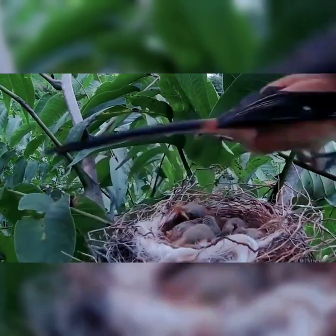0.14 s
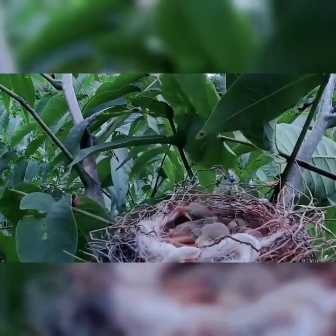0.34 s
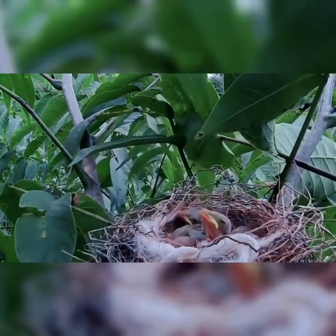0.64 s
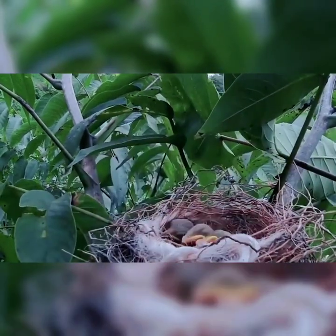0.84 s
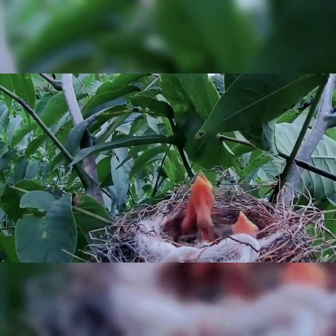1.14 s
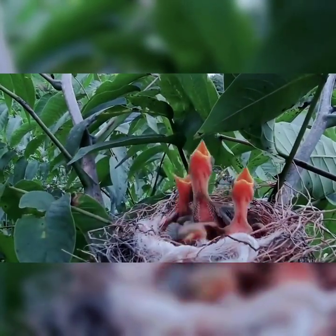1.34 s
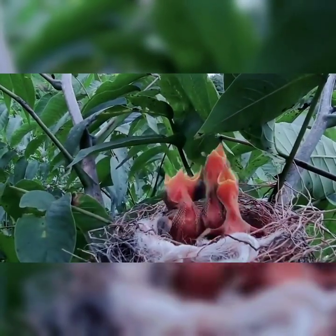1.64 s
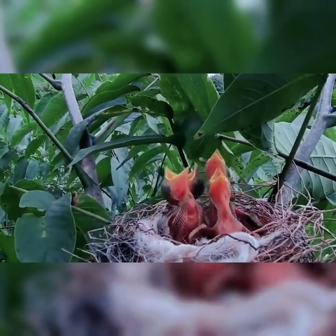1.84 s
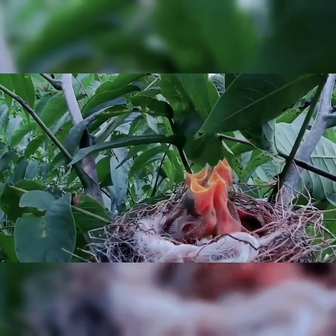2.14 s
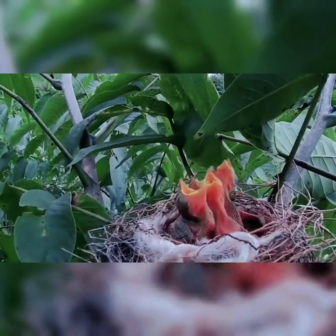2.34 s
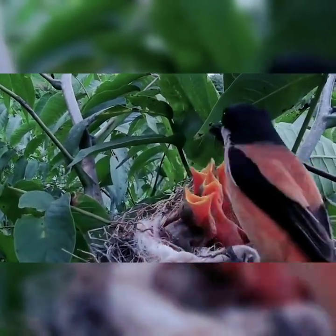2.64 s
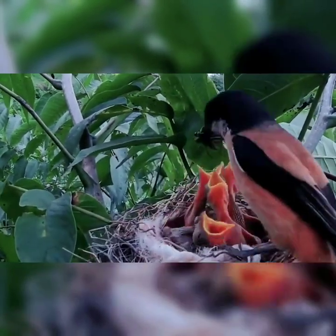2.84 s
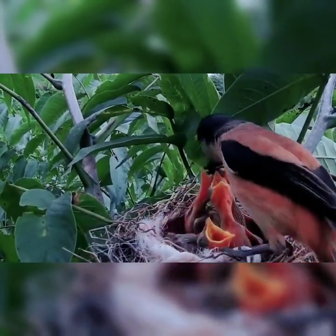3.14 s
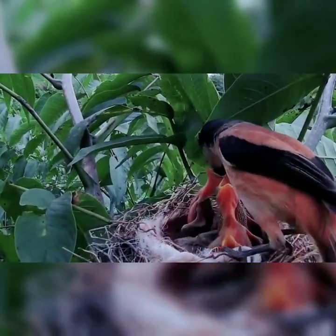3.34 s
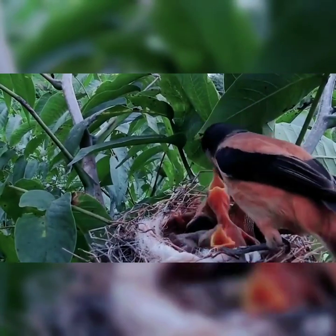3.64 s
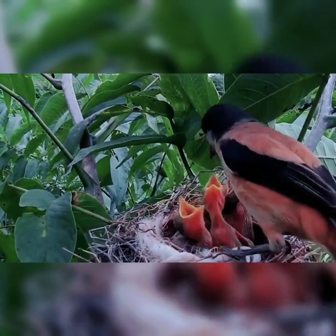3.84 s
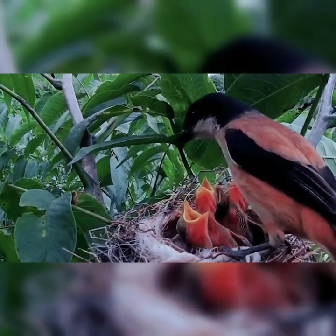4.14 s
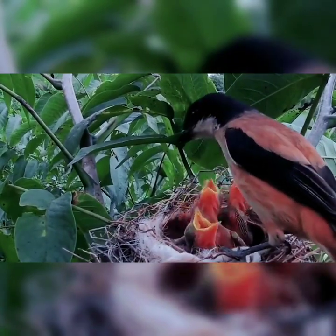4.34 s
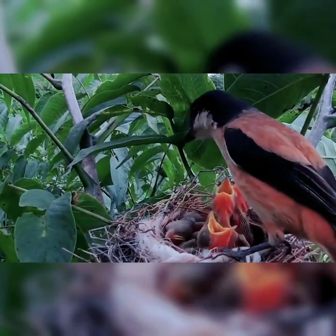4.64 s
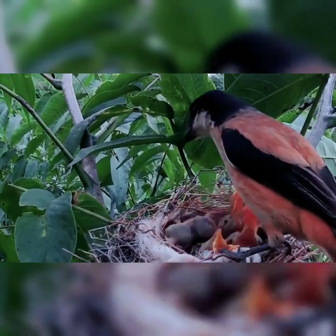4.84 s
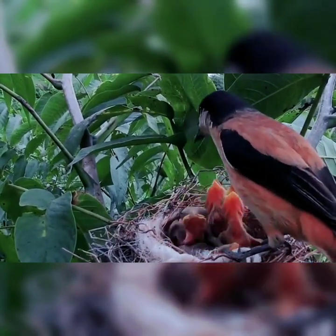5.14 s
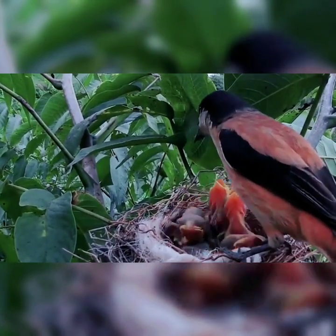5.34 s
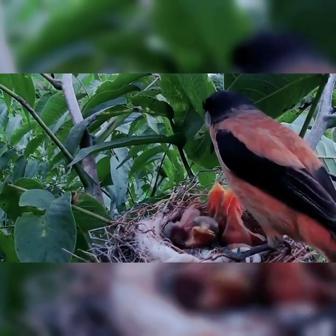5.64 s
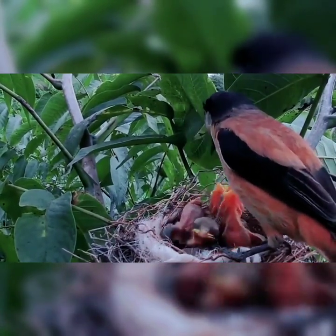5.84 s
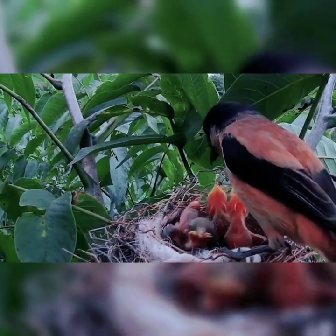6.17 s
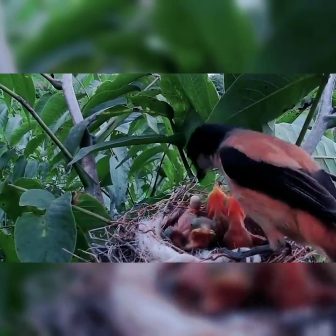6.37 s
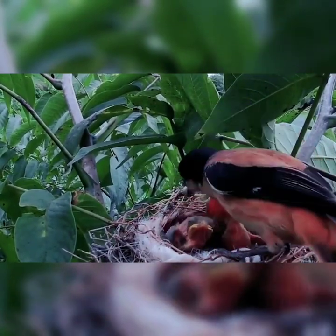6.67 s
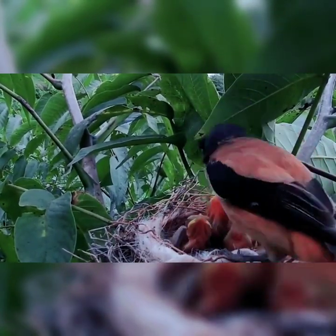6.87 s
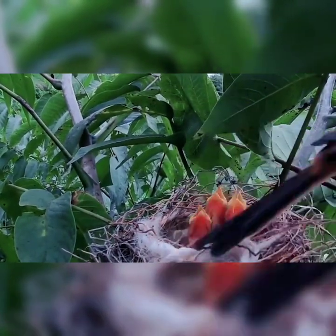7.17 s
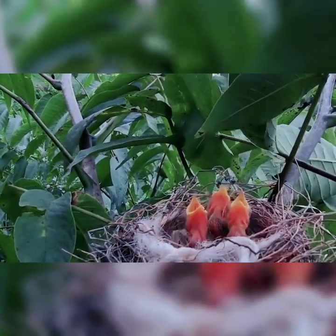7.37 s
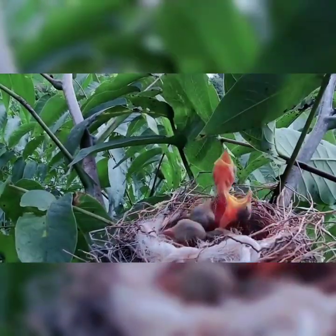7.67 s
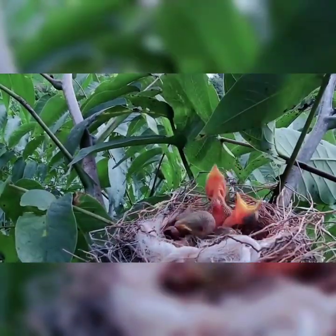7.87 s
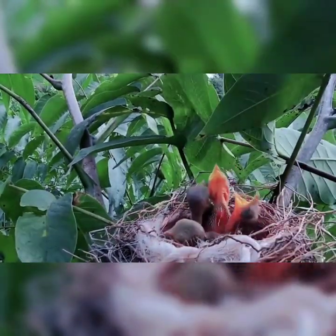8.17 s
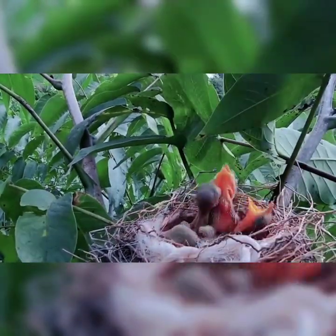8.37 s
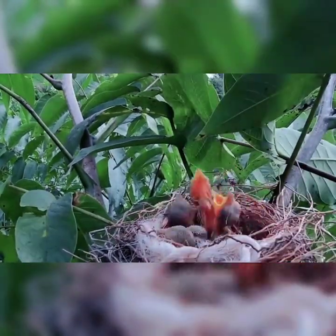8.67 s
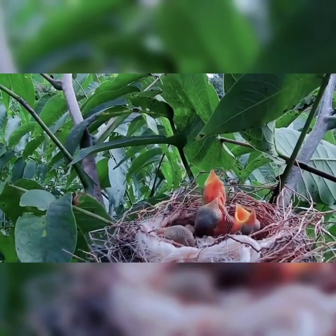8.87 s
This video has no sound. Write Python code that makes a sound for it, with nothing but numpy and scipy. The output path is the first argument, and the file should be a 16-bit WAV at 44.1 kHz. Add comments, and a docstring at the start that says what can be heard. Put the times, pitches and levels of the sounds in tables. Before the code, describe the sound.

A parent bird takes off from a nest with fluttering wing puffs and dull low thumps, after two chick cheeps and short pipes. A quiet leafy pause holds a soft knock, then the chicks break into fast, overlapping, raspy high cheeps. The parent lands with a heavy thud; begging grows loud and squealing, then thins. It flaps off again and scattered cheeps continue. Very close microphone fixed near the nest, picking up low knocks, with faint insects and forest hush behind.

```python
"""Leafy bush in a forest: nestlings beg in overlapping arched whistles with sidebands and rasp,
short piping notes, loud low squeals and thin whines, all from fluttering near-sines.
A parent flies off and lands close by: soft clucks, wing beats as puffs of noise, and decaying
sines for the knocked, swaying mount, with a lumpy rumble from the branch.
Insect blips and drones, a distant falling whistle and shaped forest noise lie behind."""
import sys
import numpy as np
from scipy import signal
from scipy.fft import rfft, irfft, next_fast_len
from scipy.io import wavfile
from scipy.ndimage import uniform_filter1d, map_coordinates

SR = 44100
rng = np.random.default_rng(int(sys.argv[2]) if len(sys.argv) > 2 else 0)


def transcribe(signal):
    """Save signal, clipped to [-1, 1], as a 16-bit WAV file at the path in sys.argv[1]."""
    frames = np.atleast_2d(signal).T
    limited = np.clip(frames, -1, 1)
    pcm = np.round(limited * 32767).astype(np.int16)
    wavfile.write(sys.argv[1], SR, pcm)


N = 397341
TIME_S = np.arange(N) / SR

# loudest begging calls: [top of arch t/s, top f/Hz, length/s, whistle level/dB]
BEG_CALLS = [(0.03, 5660, 0.1, -28.5), (0.111, 6950, 0.09, -31), (1.517, 6100, 0.078, -29),
             (1.647, 5600, 0.058, -26.5), (1.696, 7500, 0.069, -32.5), (1.8, 6970, 0.061, -26.5),
             (1.842, 7750, 0.047, -29), (1.947, 7070, 0.064, -28.5), (2.045, 5570, 0.065, -28),
             (2.097, 6850, 0.067, -28), (2.183, 5450, 0.061, -30), (2.312, 7220, 0.071, -27.5),
             (2.431, 6300, 0.043, -26.5), (2.463, 7040, 0.096, -27.5), (2.549, 6070, 0.049, -22),
             (2.6, 6940, 0.029, -21.5), (2.683, 6070, 0.089, -26.5), (2.825, 6090, 0.044, -21.5),
             (2.886, 6660, 0.057, -32.5), (2.978, 5750, 0.11, -29), (3.042, 6850, 0.043, -29),
             (3.132, 6100, 0.049, -26), (3.192, 6960, 0.046, -27), (3.311, 6240, 0.06, -23.5),
             (3.351, 6880, 0.073, -23), (3.425, 5850, 0.037, -23.5), (3.512, 7300, 0.095, -29),
             (3.646, 7310, 0.038, -22), (3.801, 7030, 0.053, -22.5), (3.916, 7340, 0.048, -32),
             (3.955, 7100, 0.063, -24), (4.105, 7120, 0.06, -25.5), (4.265, 6020, 0.042, -23),
             (4.322, 7120, 0.052, -30.5), (4.433, 7360, 0.058, -30), (4.457, 6310, 0.047, -21.5),
             (4.529, 7210, 0.045, -27), (4.628, 5800, 0.063, -28.5), (4.689, 7640, 0.085, -25.5),
             (4.786, 7150, 0.064, -24), (4.835, 6400, 0.053, -23), (4.958, 5980, 0.094, -26.5),
             (5.09, 6550, 0.036, -27), (5.153, 6200, 0.068, -28), (5.253, 6400, 0.031, -25.5),
             (5.435, 6740, 0.06, -28.5), (5.566, 6100, 0.091, -30.5), (5.632, 6480, 0.035, -20),
             (5.832, 6410, 0.052, -22.5), (6.029, 6300, 0.03, -21.5), (6.201, 6470, 0.057, -21.5),
             (6.314, 7000, 0.069, -28), (6.429, 6350, 0.028, -23), (6.629, 6130, 0.033, -28.5),
             (6.841, 6440, 0.053, -28.5), (7.055, 6500, 0.06, -30), (7.489, 6200, 0.029, -28.5),
             (7.571, 6200, 0.029, -31), (7.706, 6570, 0.071, -26), (7.858, 6890, 0.091, -24),
             (7.954, 7070, 0.023, -26.5), (8.013, 6940, 0.06, -29), (8.081, 5020, 0.07, -30),
             (8.141, 6650, 0.057, -23.5), (8.282, 6490, 0.085, -29.5), (8.394, 6600, 0.06, -29.5),
             (8.444, 5410, 0.089, -25), (8.571, 6730, 0.093, -26.5), (8.845, 7030, 0.086, -29.5),
             (8.964, 7070, 0.05, -25.5)]
# weaker calls, loudest level over time: [t/s, level/dB]
WEAK_CALL_LEVEL = [(1.5, -28), (3.3, -28), (4.8, -29.5), (5.3, -34), (9, -34)]
# brood's voice over time: [t/s, relative rasp level/dB, relative sideband level/dB, mean sink after top f/Hz]
BROOD_VOICE = [(0, -14, -11, 900), (1.6, -3.5, -12, 1100), (2.6, -9, -15, 900), (4.7, -2, -11, 900),
               (5.6, -13, -16, 1100), (7.5, -14, -17, 800), (7.9, -11, -9, 1700)]
# piping notes: [middle t/s, lowest f/Hz, level/dB, half length/s]
PIPING_NOTES = [(0.084, 3760, -20.5, 0.018), (0.315, 3500, -19.5, 0.0061), (1.563, 3295, -20, 0.0094),
                (1.963, 3270, -21.5, 0.0094), (2.083, 3226, -22, 0.011), (2.871, 3370, -23.5, 0.0063),
                (3.207, 3250, -20.5, 0.014), (4.092, 3130, -22, 0.003), (4.49, 3260, -19.5, 0.00257),
                (5.363, 3210, -23.5, 0.018), (5.684, 3300, -19.5, 0.0081), (6.019, 3010, -9.5, 0.0089),
                (6.743, 3200, -19.5, 0.021)]
# low squeals, one contour each, rows: [t/s, f/Hz, level/dB]
SQUEAL_CONTOURS = [
    [(5.095, 3150, -31), (5.11, 2860, -17.5), (5.128, 3500, -29), (5.148, 2950, -19.5),
     (5.179, 3990, -23.5)],
    [(5.287, 2970, -25), (5.31, 4430, -21.5), (5.333, 4540, -17.5), (5.345, 4400, -21), (5.357, 4700, -16),
     (5.384, 3160, -31)],
    [(5.487, 2890, -28), (5.505, 3930, -22.5), (5.52, 3870, -18), (5.545, 4460, -43)],
    [(5.7, 3240, -21), (5.706, 2990, -13), (5.737, 4050, -31.5)],
    [(5.941, 3250, -21), (5.955, 3180, -16), (5.968, 4160, -30), (5.995, 5100, -38), (6.012, 4040, -35)],
]
# thin whines: [start t/s, length/s, start f/Hz before scoop, end f/Hz, level/dB]
WHINE_NOTES = [(0.175, 0.064, 3780, 4170, -30.5), (0.538, 0.07, 4270, 3930, -34),
               (1.286, 0.15, 3990, 3220, -31.5), (4.134, 0.073, 5720, 5640, -31.5),
               (4.333, 0.076, 5700, 5300, -41), (4.653, 0.059, 5950, 5820, -26),
               (6.531, 0.069, 3450, 3510, -34.5), (7.07, 0.086, 3540, 3600, -32.5),
               (7.565, 0.073, 3510, 3630, -37.5)]
# parent's clucks: [middle t/s, middle f/Hz, middle level/dB]
CLUCK_NOTES = [(4.101, 1438, -29), (4.113, 1360, -31.5), (4.916, 1340, -36.5)]
# wing beats: [t/s, relative knock level/dB, low-mode pitch factor, relative puff level/dB]
WING_BEATS = [(0.224, -20, 0.9, -23.5), (0.254, -4.5, 1.02, -22.5), (.277, -7.5, 0.77, -35),
              (0.338, -8, 0.64, -18.5), (1.025, -0.5, 1.05, -19), (2.08, -18, 1.1, -13),
              (2.157, -2, 0.9, -11), (2.226, -6, 1.06, -12.5), (2.259, -13.5, 1.2, -16),
              (2.539, -14.5, 0.98, -12), (2.665, -8, .92, -15.5), (7.236, -3, 0.96, -19),
              (7.265, -9, 0.72, -28), (7.339, -7.5, 0.82, -30), (8.956, -21, 1.17, -18)]
# feathers brushing leaves: [t/s, relative level/dB, Gaussian sigma/s]
LEAF_BRUSHES = [(0.321, -23, 0.015), (0.353, -13, 0.0035), (0.456, -20, 0.0041), (2.635, -20, 0.0029),
                (7.305, -17.5, 0.0096)]
# mount ring modes: [f/Hz before pitch factor, relative level/dB, t60/s]
MOUNT_MODES = [(157.7, -5, 0.25), (228.7, -2, 0.15), (318, -4.5, 0.057), (642, -13, 0.053),
               (1105, -22, 0.075)]
# mount sways at take-off and landing: [t/s, strength/dB, t60/s]
MOUNT_SWAYS = [(0.338, -0.5, 0.4), (1.058, 3.5, 0.62), (2.101, -8.5, 0.41), (2.2, -3, 0.18),
               (2.6, 12, 0.05), (7.338, 2.5, 0.41)]
# distant whistles: [start t/s, level/dB]
FAR_WHISTLES = [(.84, -40.5), (7.578, -49)]
# forest floor: [t/s, relative level/dB]
FOREST_LEVEL = [(0, -36), (2.9, -35), (4, -38.5), (6.5, -40), (9, -39.5)]
# wavering forest bands, rumble to insects: [f/Hz, nominal width/Hz, relative level/dB, waver/dB]
DRONE_BANDS = [(154.2, 28, -43, 5), (760, 128, -56, 5), (3445, 550, -44.5, 3.5), (3434, 75, -44.5, 6)]
# noise colours of dull air, bright air and forest: [f/Hz, relative spectral level/dB]
DULL_AIR_SPECTRUM = [(100, 18), (300, -2), (650, 5), (1150, 9.5), (2000, -4.5), (3200, -52), (7000, -43),
                     (14000, -75)]
BRIGHT_AIR_SPECTRUM = [(200, 12.5), (1000, 0.5), (2200, -3), (3300, 4), (7300, -6.5), (9000, -22),
                       (15000, -45)]
FOREST_SPECTRUM = [(25, 7), (70, -1), (220, 1.5), (500, -15), (800, -11), (2200, -16), (4000, -18),
                   (7200, -14.5), (8600, -24.5), (13200, -40), (15500, -77)]

# call arch: climb from the throat's resonance, then part of the way back down
RISE_SHARE, RISE_POWER, FOOT_HZ, SINK_POWER = 0.36, 2.7, 3184, 1.8
# weaker calls: uniform ranges
WEAK_TOP_MIN_HZ, WEAK_TOP_RANGE_HZ = 5000, 2600
WEAK_MIN_S, WEAK_MAX_S = 0.045, 0.12
WEAK_RISE_MIN, WEAK_RISE_RANGE = 0.27, 0.45
WHINE_STEP_DB, WHINE_SCOOP_HZ = -6, 700
# puff: exponential time constants, then a wide Gaussian wash
PUFF_ATTACK_S, PUFF_DECAY_S, PUFF_BRIGHT_DB = 0.0043, 0.0067, -5
WASH_DB, WASH_SIGMA_S = -21, 0.034
RUSTLE_DB, RUSTLE_DECAY_S = -16, 0.15
SWAY_HZ = 36.3
STOPBAND_HZ = 16000


def from_db(db):
    """Amplitude from dB."""
    return 10 ** (np.asarray(db) / 20)


def rms_one(x):
    """Scale to rms 1."""
    return x / np.sqrt(np.mean(x ** 2) + 1e-20)


def curve(rows, s):
    """Straight lines through the rows, read at s."""
    return np.interp(s, *np.transpose(rows))


def add(out, s, sound):
    """Mix a sound in from time s on."""
    start = int(round(s * SR))
    lo, hi = max(start, 0), min(start + len(sound), N)
    if hi > lo:
        out[lo:hi] += sound[lo - start:hi - start]


def drift(rate_hz, size):
    """Smooth random wander of spread about 1, through rate_hz knots per second."""
    knots = rng.standard_normal(int(size * rate_hz / SR) + 4)
    position = 1 + np.arange(size) * rate_hz / SR
    return map_coordinates(knots, [position], order=3, mode="nearest")


def shaped_noise(spectrum):
    """Noise of a given colour, rms 1."""
    hz, db = np.transpose(spectrum)
    size = next_fast_len(N)
    bins_hz = np.maximum(np.fft.rfftfreq(size, 1 / SR), 1)
    gain = from_db(np.interp(np.log(bins_hz), np.log(hz), db))
    return rms_one(irfft(rfft(rng.standard_normal(size)) * gain)[:N])


def resonate(x, hz, width_hz):
    """Two-pole resonance, gain about 1 on top."""
    r = np.exp(-np.pi * width_hz / SR)
    numerator = np.array([1, 0, -1]) * (1 - r * r) / 2
    denominator = [1, -2 * r * np.cos(2 * np.pi * hz / SR), r * r]
    return signal.lfilter(numerator, denominator, x)


def whistle(pitch_hz, jitter, shimmer_db, flutter_hz=650):
    """Near sine of rms about 1 whose pitch (jitter as a fraction) and level flutter."""
    size = len(pitch_hz)
    phase = 2 * np.pi * np.cumsum(pitch_hz * (1 + jitter * drift(flutter_hz, size))) / SR
    return np.sqrt(2) * np.sin(phase) * from_db(shimmer_db * drift(flutter_hz / 2, size))


def fade(u, edge):
    """Closes a note smoothly as u nears -1 or 1."""
    return np.sin(np.pi / 2 * np.clip((1 - np.abs(u)) / edge, 0, 1)) ** 2


def cheep(s, top_hz, length_s, rise_share, flank_db=11, throat_db=6, rasp_db=-7):
    """Arched whistle over a ladder of sidebands from the slower beat of the syrinx, plus rasp."""
    times, *columns = np.transpose(BROOD_VOICE)
    hoarse_db, sideband_db, sink_hz = [np.interp(s, times, column) for column in columns]
    rise_s, fall_s = rise_share * length_s, (1 - rise_share) * length_s
    t = np.arange(-rise_s, fall_s, 1 / SR)
    size = len(t)
    u = np.where(t < 0, t / rise_s, t / fall_s)
    climb = (top_hz - FOOT_HZ) * np.abs(u) ** RISE_POWER
    sink = sink_hz * (0.5 + rng.random()) * np.abs(u) ** SINK_POWER
    pitch = (top_hz - np.where(t < 0, climb, sink)) * (1 + 0.017 * drift(110, size))

    arch_db = -flank_db * u ** 2
    roughness = from_db(hoarse_db)
    call = from_db(arch_db + 2.4 * drift(150, size)) * whistle(pitch, 0.004 + 0.012 * roughness, 2.5)

    spacing = rng.uniform(0.11, 0.18)  # fraction of the pitch
    for step in (-3, -2, -1, 1):
        partial = pitch * (1 + step * spacing)
        # the throat lifts its own resonance and shuts out what lies below
        lift_db = throat_db / (1 + ((partial - 3500) / 400) ** 2)
        cut_db = np.maximum(3200 - partial, 0) / 30
        level_db = sideband_db - 2 - 2 * abs(step + 1) + lift_db - cut_db + arch_db / 2
        waver_db = 4 * drift(90, size)
        call += from_db(level_db + waver_db) * whistle(partial, 0.006 + 0.02 * roughness, 2.5)

    rasp = drift(3600, size) * whistle(np.full(size, 0.8 * top_hz), 0.06, 2)
    call += from_db(rasp_db + hoarse_db + arch_db + 5 * drift(100, size)) * rasp
    return call * fade(u, 0.1)


def begging(scatter_db=8.5, count=95):
    """Listed loud calls, with weaker calls at jittered intervals, band-limited together."""
    out = np.zeros(N)
    for s, top_hz, length_s, db in BEG_CALLS:
        add(out, s - RISE_SHARE * length_s, from_db(db) * cheep(s, top_hz, length_s, RISE_SHARE))
    first_s = WEAK_CALL_LEVEL[0][0]
    for slot, (late, high, long, soft, lean) in enumerate(rng.random((count, 5))):
        s = first_s + (slot + late) / count * (N / SR - first_s)
        length_s = WEAK_MIN_S + (WEAK_MAX_S - WEAK_MIN_S) * long
        rise_share = WEAK_RISE_MIN + WEAK_RISE_RANGE * lean
        weak = cheep(s, WEAK_TOP_MIN_HZ + WEAK_TOP_RANGE_HZ * high, length_s, rise_share)
        level_db = curve(WEAK_CALL_LEVEL, s) - scatter_db * soft
        add(out, s - rise_share * length_s, from_db(level_db) * weak)
    band = signal.butter(6, [2800, 8000], "band", fs=SR, output="sos")
    return signal.sosfilt(band, out)


def piping(bend=0.248, flank_db=11):
    """Short notes dip in pitch to the throat's resonance; the loud ones are the purest."""
    out = np.zeros(N)
    for s, hz, db, half_s in PIPING_NOTES:
        u = np.arange(-half_s, half_s, 1 / SR) / half_s
        rough = np.clip((-db - 8) / 14, 0.15, 1.0)
        pitch = hz * (1 + bend * u ** 2 * half_s / 0.02)  # longer notes bend further
        note = whistle(pitch, 0.03 * rough, 2.8 * rough)
        add(out, s - half_s, from_db(db - flank_db * u ** 2) * fade(u, 0.48) * note)
    return out


def squealing(second_ratio=1.27, second_db=-15):
    """Low squeals swoop up and down; the syrinx's other side adds a rough, higher voice."""
    out = np.zeros(N)
    for points in SQUEAL_CONTOURS:
        s, hz, db = np.transpose(points)
        t = np.arange(s.min(), s.max(), 1 / SR)
        pitch = uniform_filter1d(np.interp(t, s, hz), size=350, mode="nearest")
        second = whistle(second_ratio * pitch, 0.04, 5)
        voice = whistle(pitch, 0.012, 1.8) + from_db(second_db) * second
        envelope = from_db(np.interp(t, s, db)) * fade(np.linspace(-1, 1, len(t)), 0.1)
        add(out, s[0], envelope * voice)
    return out


def whining():
    """Thin notes scoop up, hold, then bend to their end pitch; two sidebands arch above each."""
    out = np.zeros(N)
    for s, length_s, start_hz, end_hz, db in WHINE_NOTES:
        u = np.linspace(0, 1, int(length_s * SR))
        pitch = start_hz + (end_hz - start_hz) * u ** 2 - WHINE_SCOOP_HZ * (1 - u) ** 8
        spacing_hz = 450 + 540 * np.sin(np.pi * u) + 72 * drift(50, len(u))
        for step in range(3):
            level_db = db + step * WHINE_STEP_DB + 2.5 * drift(70, len(u))
            line = whistle(pitch + step * spacing_hz, 0.01, 2)
            add(out, s, from_db(level_db) * fade(2 * u - 1, 0.34) * line)
    return out


def clucks(half_s=0.0073, overtone_db=-7):
    """Parent's brief falling notes, loudest near the start, with an octave above."""
    out = np.zeros(N)
    u = np.arange(-half_s, half_s, 1 / SR) / half_s
    for s, hz, db in CLUCK_NOTES:
        pitch = hz * (1 - 0.034 * u)
        voice = whistle(pitch, 0.015, 1.5) + from_db(overtone_db) * whistle(2 * pitch, 0.02, 2.5)
        add(out, s - half_s, from_db(db - 9.7 * u) * fade(u, 0.35) * voice)
    return out


def wings(grain_db=3.5, puff_trim_db=-1.0, leaves_dull_db=-12.0):
    """Air noise: mainly dull from wing strokes, mainly bright where feathers brush leaves."""
    puffs, leaves = np.zeros(N), np.zeros(N)
    t = np.arange(-SR // 2, SR // 2) / SR
    puff = np.exp(-np.abs(t) / np.where(t < 0, PUFF_ATTACK_S, PUFF_DECAY_S))
    puff += from_db(WASH_DB) * np.exp(-(t / WASH_SIGMA_S) ** 2 / 2)
    for s, _, _, db in WING_BEATS:
        add(puffs, s + t[0], from_db(db + puff_trim_db) * puff)
    rustle = from_db(RUSTLE_DB) * (t > 0) * np.exp(-np.abs(t) / RUSTLE_DECAY_S)
    for s, db, sigma_s in LEAF_BRUSHES:
        add(leaves, s + t[0], from_db(db) * (np.exp(-(t / sigma_s) ** 2 / 2) + rustle))
    dull = puffs + from_db(leaves_dull_db) * leaves
    bright = leaves + from_db(PUFF_BRIGHT_DB) * puffs
    air = dull * shaped_noise(DULL_AIR_SPECTRUM) + bright * shaped_noise(BRIGHT_AIR_SPECTRUM)
    return air * from_db(grain_db * drift(500, N))


def mount(rattle_db=1.5, push_s=0.003):
    """Wing beats ring the mount's modes; heavy pushes set the whole of it swaying."""
    out = np.zeros(N)
    t = np.arange(SR) / SR
    for s, db, factor, _ in WING_BEATS:
        for hz, mode_db, t60_s in MOUNT_MODES:
            pitch = hz * factor if hz < 500 else hz  # the bird's weight shifts only the low modes
            level_db = db + mode_db + rattle_db * rng.standard_normal() - 60 * t / t60_s
            add(out, s, from_db(level_db) * np.sin(2 * np.pi * pitch * t))
    for s, db, t60_s in MOUNT_SWAYS:
        envelope = from_db(db - 60 * t / t60_s) * (1 - np.exp(-t / push_s))
        add(out, s, envelope * np.sin(2 * np.pi * SWAY_HZ * t))
    return out


def shaken_branch(motion, settle_s=0.052, level_db=-19):
    """Branch trembles on against the mount: lumpy rumble following the smoothed motion energy."""
    r = np.exp(-1 / (settle_s * SR))
    envelope = np.sqrt(signal.lfilter([1 - r], [1, -r], motion ** 2 + 1e-18))
    rumble = shaped_noise([(30, 4.0), (200, 11.0), (330, -6.5), (600, -14.5), (2000, -68.0)])
    return from_db(level_db + 5.6 * drift(70, N)) * envelope * rumble


def insect(per_s=40, lowest_hz=6700, spread_hz=1300, loudest_db=-41, half_s=0.0077):
    """Insect ticks unevenly, each tick a tiny high blip."""
    out = np.zeros(N)
    u = np.arange(-half_s, half_s, 1 / SR) / half_s
    for slot, (late, soft, high) in enumerate(rng.random((int(per_s * N / SR), 3))):
        pitch = np.full(len(u), lowest_hz + spread_hz * high ** 2)
        blip = fade(u, 1) * whistle(pitch, 0.02, 2)
        add(out, (slot + late / 2) / per_s, from_db(loudest_db - 10 * soft) * blip)
    return out


def far_bird(start_hz=2800, end_hz=2450, length_s=0.15):
    """Faint whistle slides down in a straight line."""
    out = np.zeros(N)
    u = np.linspace(-1, 1, int(length_s * SR))
    for s, db in FAR_WHISTLES:
        note = whistle(np.linspace(start_hz, end_hz, len(u)), 0.012, 2.0)
        add(out, s, from_db(db) * fade(u, 0.5) * note)
    return out


def forest(floor_trim_db=-0.5):
    """Soft noise floor with wavering resonant bands of rumble and insect song."""
    level_db = curve(FOREST_LEVEL, TIME_S) + floor_trim_db + 1.3 * drift(25, N)
    out = from_db(level_db) * shaped_noise(FOREST_SPECTRUM)
    for hz, width_hz, db, waver_db in DRONE_BANDS:
        pole_width_hz = 2.24 * width_hz  # two passes narrow the band
        once = resonate(rng.standard_normal(N), hz, pole_width_hz)
        band = rms_one(resonate(once, hz, pole_width_hz))
        out += band * from_db(db + waver_db * drift(45, N) + 0.97 * drift(18.0, N))
    return out


def foliage(x, t60_s=0.4, wet_db=-16):
    """Leaves and trunks scatter a short diffuse tail, modelled as decaying noise."""
    t = np.arange(SR // 2) / SR
    tail = rng.standard_normal(len(t)) * from_db(-60 * t / t60_s) * (t > 0.004)
    tail /= np.sqrt(np.sum(tail ** 2))
    return x + from_db(wet_db) * signal.fftconvolve(x, tail)[:N]


def scene(overtone_db=-19):
    """Nest and parent close by, forest behind, in one channel."""
    brood = begging() + piping() + squealing() + whining()
    # squaring gives the voices a faint octave and sum tones
    highpass = signal.butter(2, 5000, "high", fs=SR, output="sos")
    octave = signal.sosfilt(highpass, brood ** 2)
    near = brood + from_db(overtone_db) * octave + clucks() + wings()
    motion = mount()
    mix = foliage(near + far_bird()) + motion + shaken_branch(motion) + insect() + forest()
    return mix[None]


def record(dry, ceiling=1.0):
    """Overload rounds off the largest swings; a steep low-pass cuts the top."""
    rounded = dry / (1 + (dry / ceiling) ** 4) ** (1 / 4)
    lowpass = signal.cheby2(12, 70, STOPBAND_HZ, fs=SR, output="sos")
    return signal.sosfilt(lowpass, rounded)


dry = scene()
out = record(dry)
transcribe(out)
```